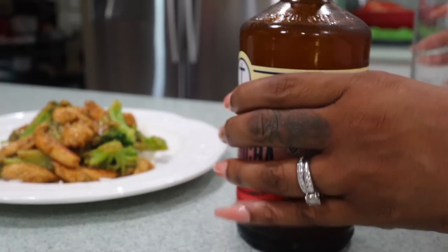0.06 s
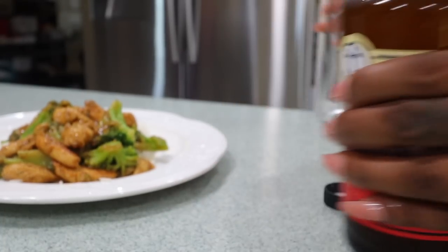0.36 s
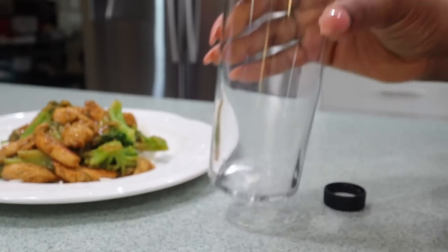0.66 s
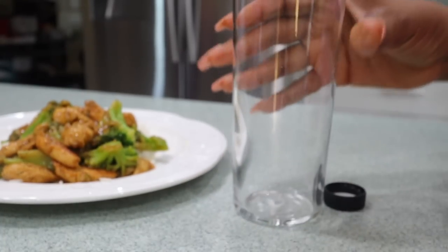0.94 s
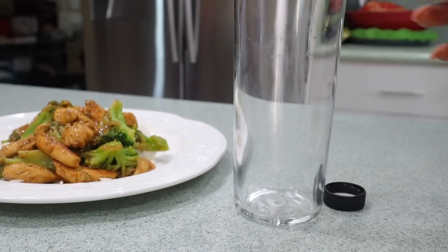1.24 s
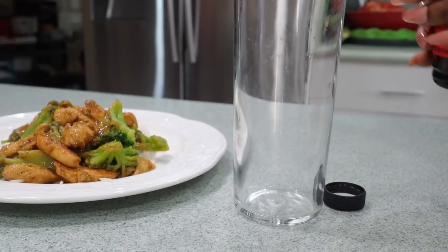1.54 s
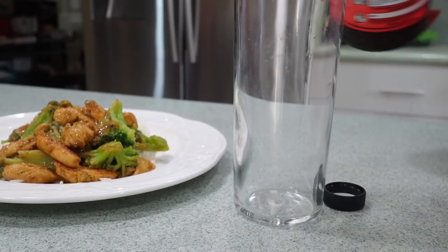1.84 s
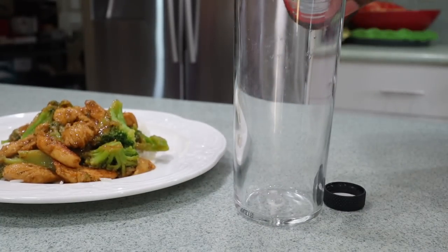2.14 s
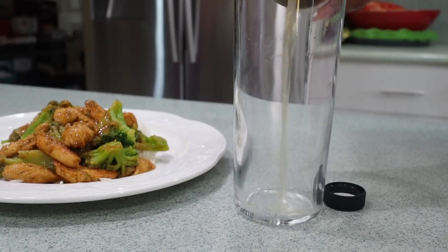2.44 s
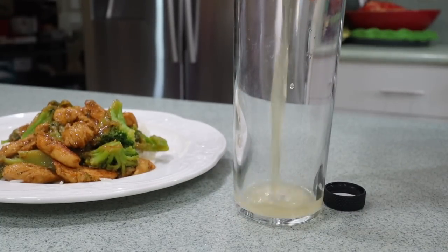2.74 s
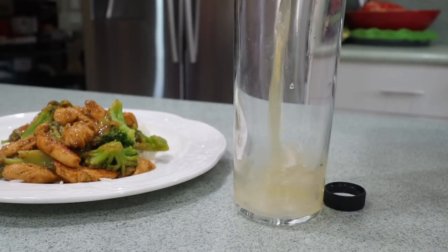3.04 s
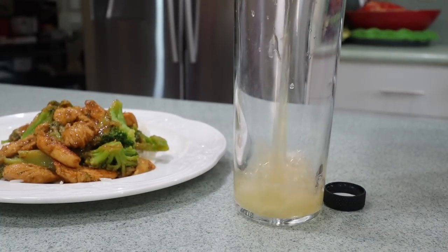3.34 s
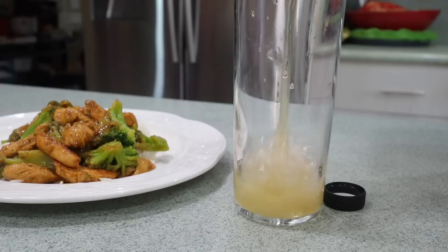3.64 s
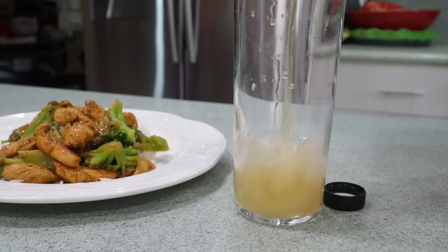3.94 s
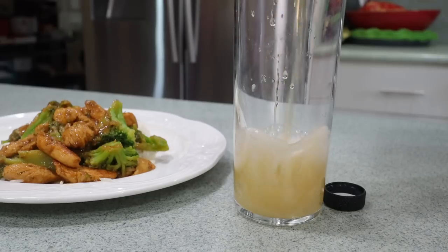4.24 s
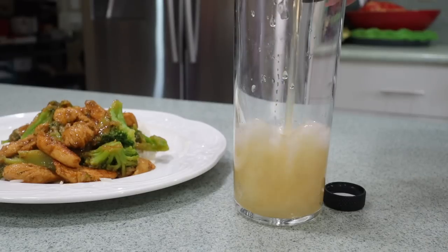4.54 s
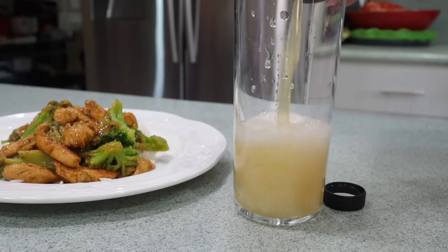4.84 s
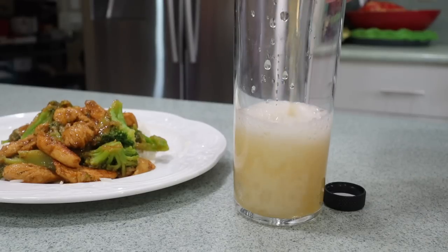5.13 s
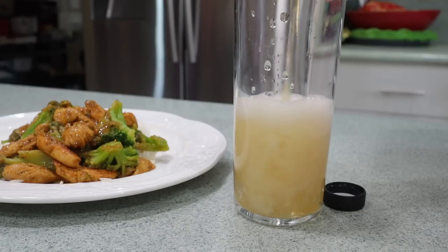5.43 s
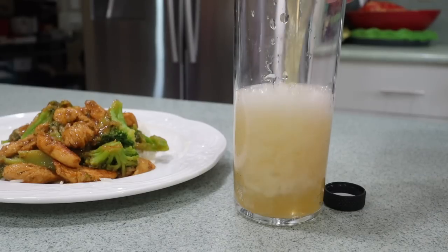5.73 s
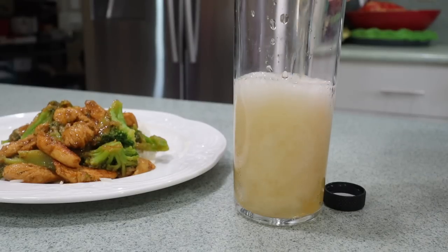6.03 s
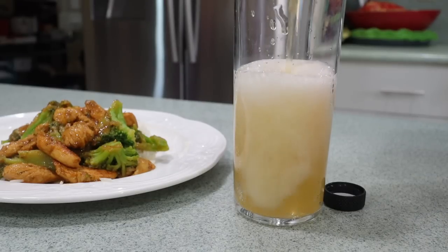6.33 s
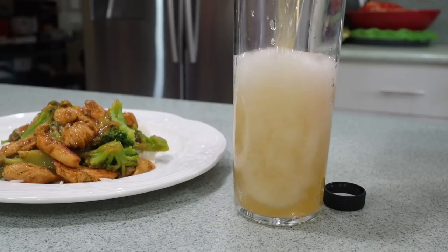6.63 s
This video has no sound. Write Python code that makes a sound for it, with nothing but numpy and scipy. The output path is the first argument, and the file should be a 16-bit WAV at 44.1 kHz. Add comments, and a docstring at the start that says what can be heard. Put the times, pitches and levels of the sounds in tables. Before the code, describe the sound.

Close by in a slightly echoing kitchen, a bottle lands with a double knock, then a glass clatters down and leaves a thin ring. After a short pause, a carbonated drink glugs out of the bottle and splashes brightly into the glass, with bubbly plops and tiny snaps. The pour climbs in pitch and grows softer and duller as fizzing foam builds. A fridge hums faintly underneath.

```python
"""Pouring a fizzy drink

A full bottle, then a tall glass, knock down on a kitchen counter; the glass rocks and sings on.
The bottle glugs as it gulps air, and each gush splashes, plops and snaps in the glass, whose air
column rises in pitch as it fills. A head of foam grows, muffles the splashing and fizzes finely.
The kitchen reverberates, and a fridge hums underneath."""
import sys
import numpy as np
from scipy import signal
from scipy.fft import rfft, irfft
from scipy.io import wavfile
from scipy.ndimage import uniform_filter1d

SR = 44100
rng = np.random.default_rng(int(sys.argv[2]) if len(sys.argv) > 2 else 0)


def transcribe(u):
    """Save the signal u as a 16-bit wav file named by the first command-line argument.

    u: samples, shape (n,) or (channels, n), limited to [-1, 1]; the rate is SR.
    q: integer samples, one column per channel.
    """
    v = np.clip(np.atleast_2d(u).T, -1, 1)
    q = np.round(v * 32767).astype(np.int16)
    wavfile.write(sys.argv[1], SR, q)


N = 298983
TIME = np.arange(N) / SR
CUTOFF_HZ = 15900
# cabinet under the counter: (frequency [Hz], level [dB], t60 [s])
CABINET_MODES = [(140, -31, 0.12), (209, -26.5, 0.25), (277, -28, 0.2), (366, -31, 0.16)]


def from_db(db):
    return 10 ** (np.asarray(db) / 20)


def rms_one(x):
    return x / np.sqrt(np.mean(x ** 2) + 1e-20)


def decay(t, t60):
    """An envelope that falls 60 dB in t60 seconds."""
    return np.exp(-np.log(1000) * t / t60)


def in_time(rows):
    """Each column of a breakpoint curve, at every sample."""
    times, *columns = np.transpose(rows)
    return [np.interp(TIME, times, column) for column in columns]


def at_hz(points, hz, column=1):
    """One column of a spectrum, read on a log-frequency axis."""
    table = np.array(points)
    return np.interp(np.log(hz + 1e-9), np.log(table[:, 0]), table[:, column])


def add(out, s, sound):
    """Mix a sound in from time s on."""
    i = max(round(s * SR), 0)
    out[i:i + len(sound)] += sound[:max(N - i, 0)]


def cut(x, hz, kind, order=2):
    """Butterworth low-, high- or band-pass."""
    return signal.sosfilt(signal.butter(order, np.clip(hz, 10, .45 * SR), kind, fs=SR, output="sos"), x)


def ring(x, hz, t60):
    """One mode: a unit click sets a sine of height 1 ringing."""
    r, w = decay(1 / SR, t60), 2 * np.pi * hz / SR
    return signal.lfilter([0, np.sin(w)], [1, -2 * r * np.cos(w), r * r], x + 1e-18)


def resonance(hz, width_hz):
    """Filter coefficients of a peak of gain 1."""
    r = np.exp(-np.pi * width_hz / SR)
    return np.array([1, 0, -1]) * (1 - r * r) / 2, [1, -2 * r * np.cos(2 * np.pi * hz / SR), r * r]


def gliding(x, hz, width_hz, block=512):
    """A resonance that follows curves of pitch and width."""
    out, state = np.zeros(N), np.zeros(2)
    for i in range(0, N, block):
        b, a = resonance(hz[i], width_hz[i])
        out[i:i + block], state = signal.lfilter(b, a, x[i:i + block], zi=state)
    return out


def evened(x, span_s):
    """Hold the short-term rms of a texture near 1."""
    power = uniform_filter1d(x ** 2, int(span_s * SR))
    return x / np.sqrt(np.abs(power) + 1e-4)


def blow(db, hardness_hz):
    """A contact click, duller for a softer hit."""
    return from_db(db) * cut(signal.unit_impulse(SR // 20), hardness_hz, "low", order=3)


def struck(force, modes):
    """A body rings; neighbouring modes swing in opposite directions."""
    return sum((-1) ** k * from_db(db) * ring(force, hz, t60) for k, (hz, db, t60) in enumerate(modes))


def bubble(hz, swell_s, t60, rise):
    """A sine that swells to height 1 and dies away, its pitch climbing by the share `rise` per t60."""
    t = TIME[:SR // 8]
    shape = (1 - np.exp(-(t / swell_s) ** 2)) * decay(t, t60)
    return shape / shape.max() * np.sin(2 * np.pi * hz * (t + rise * t * t / (2 * t60)))


def bubble_cloud(spectrum, per_s, spread_db, cycles, pitches=36):
    """Bubbles of random strength and pitch, each dying within `cycles` periods; rms 1."""
    out = np.zeros(N)
    for hz in np.geomspace(spectrum[0][0], min(spectrum[-1][0], CUTOFF_HZ), pitches):
        born = np.flatnonzero(rng.random(N) < per_s / pitches / SR)
        strength = from_db(spread_db * np.minimum(rng.exponential(1, len(born)), 4))
        clicks = np.zeros(N)
        clicks[born] = strength * rng.choice([-1, 1], len(born))
        out += from_db(at_hz(spectrum, hz)) * np.sqrt(hz) * rms_one(ring(clicks, hz, cycles / hz))
    return rms_one(cut(out, 0.68 * spectrum[0][0], "high"))


def room_tone(air_db=-59):
    """A bed of soft air noise and fridge hum."""
    # colour of the air: (frequency [Hz], relative level [dB])
    air_spectrum = [(12, -56), (20, -14), (26, -27), (65, -6), (101, -18.5), (163, -0.5), (241, -18.5),
                    (301, -12), (446, -16.5), (590, -16.5), (923, -24), (1090, -23.5), (2820, -32.5),
                    (6360, -33.5), (16000, -37.5)]
    # fridge: (frequency [Hz], level [dB])
    hum_partials = [(58, -72), (160, -75), (216, -68), (270, -73), (589, -69.5)]
    colour = from_db(at_hz(air_spectrum, np.fft.rfftfreq(N, 1 / SR)))
    air = irfft(rfft(rng.standard_normal(N)) * colour, N)
    hum = sum(from_db(db) * np.sin(2 * np.pi * (hz * TIME + rng.random())) for hz, db in hum_partials)
    return from_db(air_db) * rms_one(air) + hum


def kitchen_reverb(x, predelay_s=0.006, build_s=0.024, bands=16):
    """Diffuse reflections build up and die away band by band."""
    # reverb tail: (frequency [Hz], level [dB], t60 [s])
    tail_bands = [(59.64, -26, 0.2), (112, -18, 0.49), (170, -11.5, 0.33), (281.8, -13.5, 0.18),
                  (449.6, -14.5, 0.42), (695, -14.5, 0.13), (1130, -15.5, 0.34), (2493, -13.5, 0.38),
                  (4900, -18.5, 0.54), (8850, -20.5, 0.72), (16100, -24, 0.12)]
    t, response = TIME[:SR], 0
    edges = np.geomspace(50, CUTOFF_HZ, bands + 1)
    onset = 1 - np.exp(-np.maximum(t - predelay_s, 0) / build_s)
    for low, high in zip(edges, edges[1:]):
        hz = np.sqrt(low * high)
        shape = onset * decay(t, at_hz(tail_bands, hz, column=2))
        noise = cut(rng.standard_normal(SR), [low, high], "band")
        response += from_db(at_hz(tail_bands, hz)) * noise * shape / np.linalg.norm(shape)
    return signal.fftconvolve(x, response)[:N]


def bottle_knocks(bass_cut_hz=400, cabinet_db=-7):
    """The full bottle thuds on the counter and rings briefly."""
    # it lands on one edge, then flat: (time [s], level [dB], contact hardness [Hz])
    landings = [(0.0713, -9.5, 2200), (0.1292, -5.5, 1050)]
    # bottle standing on the counter: (frequency [Hz], level [dB], t60 [s])
    bottle_modes = [(560.5, -3.5, 0.12), (677, -11.5, 0.048), (795, -23, 0.05), (1032, -8, 0.036),
                    (1179, -9, 0.066), (1423, -10.5, 0.023), (1543, -9.5, 0.042), (1690, -4, 0.019),
                    (2215, -8, 0.019), (3270, -11, 0.0065), (4620, -22, 0.08), (9600, -9.5, 0.092)]
    force = np.zeros(SR)
    for s, db, hardness_hz in landings:
        add(force, s, blow(db, hardness_hz))
    knock = cut(struck(force, bottle_modes), bass_cut_hz, "high", order=3)
    boom = from_db(cabinet_db) * cut(struck(force, CABINET_MODES), 68, "high")
    return np.pad(knock + boom, (0, N - len(knock)))


def glass_knocks(bass_cut_hz=430, clatter_t60=0.22, clatter_db=-15):
    """The glass rocks on its foot; each blow rings the counter and the glass itself."""
    # blows: (time [s], level [dB], contact hardness [Hz], glass ring re the blow [dB])
    landings = [(0.8242, -2, 11800, 3), (.8425, -12, 2470, -5), (0.869, -12, 1900, 14),
                (0.93, -10.5, 1300, 5.5), (.948, -13, 1070, 13.5), (.982, -17, 1700, 0.5),
                (.9975, -16, 586, -21), (1.033, -17.5, 540, -10)]
    # counter top: (frequency [Hz], level [dB], t60 [s])
    counter_modes = [(569.9, -1.5, 0.079), (675, -14.5, 0.085), (684, -18, 0.16), (842, -6.5, 0.014),
                     (946, -11, 0.069), (1200, -10.5, 0.032), (1390, -6.5, 0.021), (1595, -2, 0.019),
                     (2233, -9, 0.019), (3306, -6.5, 0.01), (5270, -4.5, 0.0022), (8300, -11, 0.0038)]
    # glass wall, held in the hand: (frequency [Hz], level [dB], t60 [s])
    glass_modes = [(1360, -32, 0.46), (4650, -19, 0.029), (4580, -21.5, 0.085), (9490, -15, 0.0093),
                   (9650, -27, 0.054), (13080, -32.5, 0.065), (14700, -18, .018)]
    on_counter, on_glass = np.zeros((2, 2 * SR))
    for s, db, hardness_hz, glass_db in landings:
        add(on_counter, s, blow(db, hardness_hz))
        add(on_glass, s, blow(db + glass_db, hardness_hz))
    motion = struck(on_counter, counter_modes) + struck(on_glass, glass_modes)
    # the hard foot also wakes countless weak modes, which merge into a clatter
    t = TIME[:SR // 4]
    weak_modes = cut(cut(rng.standard_normal(len(t)), 520, "high"), 3600, "low", order=3)
    clatter = signal.fftconvolve(on_glass, weak_modes * decay(t, clatter_t60))[:len(motion)]
    # the stiff slab radiates little bass; the cabinet under it booms faintly
    knock = cut(motion, bass_cut_hz, "high", order=3)
    boom = cut(struck(on_counter, CABINET_MODES), 55, "high")
    return np.pad(knock + from_db(clatter_db) * clatter + boom, (0, N - len(knock)))


def chinks(touch_t60=0.043):
    """A light touch on glass rings a single mode; a tick of jewellery rings several."""
    # touches: (time [s], level [dB], pitch [Hz])
    touches = [(1.324, -55.5, 2320), (2.382, -62, 4800), (5.361, -33, 3020), (6.761, -47.5, 3880)]
    # the hand's jewellery meets glass: (time [s], level [dB])
    jewellery_ticks = [(.12, -49), (.143, -50.5), (0.959, -52), (0.966, -54)]
    # ring of a tick: (frequency [Hz], level [dB], t60 [s])
    tick_modes = [(5340, -2, 0.07), (5570, -2, 0.06), (7760, -6, 0.045), (8500, -7, 0.045),
                  (11030, -7, 0.05), (13300, -13, 0.044)]
    out, click = np.zeros(N), signal.unit_impulse(SR // 2)
    for s, db, hz in touches:
        add(out, s, from_db(db) * ring(click, hz, touch_t60))
    for s, db in jewellery_ticks:
        add(out, s, from_db(db) * struck(click, tick_modes))
    return out


def rim_ring(release_s=0.97, hz=1361, beat_hz=2.37, t60=1.43, level_db=-40, twin_db=-6):
    """Let go, the glass sings on in its lowest mode, a close pair that beats slowly."""
    out, t = np.zeros(N), TIME[:2 * SR]
    pair = np.sin(2 * np.pi * hz * t) + from_db(twin_db) * np.sin(2 * np.pi * (hz + beat_hz) * t)
    add(out, release_s, from_db(level_db) * pair * decay(t, t60))
    return out


def fizz(foam, level_db=-65):
    """Countless tiny bubbles burst in the head."""
    # colour of the fizz: (frequency [Hz], relative density [dB])
    fizz_spectrum = [(1000, 0), (1600, -4.5), (3000, -4), (5000, 6), (8000, 2.5), (11000, 5.5),
                     (16000, -3.5)]
    return from_db(level_db) * foam * bubble_cloud(fizz_spectrum, per_s=1700, spread_db=3, cycles=5)


def snaps(crack_s=0.002, ring_width_hz=450, ring_db=11, treble_hz=7000, trim_db=0.5):
    """Drops and bursting bubbles snap on the glass: a tiny crack with a brief ring."""
    # snaps: (time [s], peak before trim [dB], ring pitch [Hz], treble shelf [dB])
    snap_cues = [(2.5042, -38.5, 5300, -5), (2.652, -38, 8100, -22), (2.812, -31, 4660, -23),
                 (2.9344, -28, 6800, 19), (2.9709, -18.5, 3740, 4.5), (3.018, -28, 8160, -1),
                 (3.0995, -24, 5900, -10), (3.132, -25.5, 8150, -6), (3.267, -28, 2950, -6),
                 (3.39, -23, 6260, -24), (3.6831, -20.5, 2900, 1), (4.078, -23, 3420, -22),
                 (4.1164, -24.5, 5270, -17), (4.651, -30, 5600, -12), (5.359, -23.5, 2840, 3),
                 (5.7089, -28, 8000, -3), (6.4492, -42, 5400, 6), (6.4723, -29, 11550, -1.5)]
    out, t = np.zeros(N), TIME[:SR // 20]
    for s, db, hz, treble_db in snap_cues:
        crack = cut(rng.standard_normal(len(t)) * np.exp(-t / crack_s), 530, "high", order=1)
        crack += (from_db(treble_db) - 1) * cut(crack, treble_hz, "high", order=1)
        snap = crack + from_db(ring_db) * signal.lfilter(*resonance(hz, ring_width_hz), crack)
        add(out, s + 0.001, from_db(db + trim_db) * snap / np.abs(snap).max())
    return out


def plinks():
    """Small bubbles chirp as they near the surface."""
    # single clear bubbles: (time [s], peak [dB], pitch [Hz])
    small_bubbles = [(2.7365, -39.5, 1910), (2.7523, -37, 1640), (2.8157, -31.5, 1580),
                     (2.859, -38.5, 3560), (2.8853, -32, 1760), (2.9639, -31, 1530), (3.1443, -30, 1580),
                     (3.175, -31, 4580), (3.156, -33, 1580), (3.164, -34, 2150), (3.177, -32, 1680),
                     (3.2866, -29.5, 1670), (3.349, -39.5, 3370), (3.372, -36.5, 1770), (3.4105, -29, 1716),
                     (3.6633, -33, 1640), (3.726, -31.5, 3250), (3.9743, -30, 1820), (4.353, -34.5, 3150),
                     (4.433, -34, 1840), (4.572, -40, 2050)]
    out = np.zeros(N)
    for s, db, hz in small_bubbles:
        add(out, s, from_db(db) * bubble(hz, swell_s=0.00027, t60=0.028, rise=0.033))
    return out


def plops(foam, clear_t60=0.048, foamy_t60=0.019, body_hz=370, body_db=-9.5, pop_hz=1300, pop_db=4.5):
    """A trapped bubble swells into the air column's note; foam shortens the ring to a dull pop."""
    # big bubbles: (time [s], peak of the note [dB], pitch [Hz])
    big_bubbles = [(3.22, -28, 596), (3.331, -20.5, 611), (3.399, -18.5, 608), (3.552, -26.5, 616),
                   (3.781, -30, 596), (3.803, -28.5, 620), (3.828, -27, 642), (3.922, -25.5, 630),
                   (3.938, -24, 579), (4.025, -27.5, 638), (4.08, -27.5, 630), (4.254, -19.5, 650),
                   (4.271, -28, 665), (4.325, -33, 662), (4.432, -41.5, 673), (4.475, -32.5, 664),
                   (4.491, -37, 630), (4.558, -32, 679), (4.654, -30.5, 686), (4.769, -38, 690),
                   (4.979, -34, 564), (5.148, -32.5, 530), (5.632, -36.5, 680), (6.049, -40, 592),
                   (6.197, -38.5, 567)]
    # plops gain a low body once the drink is deep: (time [s], share of the body [0-1])
    depth_curve = [(3.4, 0), (3.8, 1)]
    out, (depth,) = np.zeros(N), in_time(depth_curve)
    for s, db, hz in big_bubbles:
        cover, deep = foam[round(s * SR)], depth[round(s * SR)]
        note = bubble(hz, swell_s=0.0026, t60=np.interp(cover, [0, 1], [clear_t60, foamy_t60]), rise=0.057)
        body = bubble(body_hz * rng.uniform(0.762, 1.22), swell_s=0.00077, t60=0.057, rise=0.06)
        pop = bubble(pop_hz * rng.uniform(0.49, 1.51), swell_s=0.0001, t60=0.0096, rise=0)
        plop = note + deep * from_db(body_db) * body + cover * from_db(pop_db) * pop
        add(out, s - 0.00101, from_db(db) * plop)
    return out


def glugs(gulp_hz=107.6, gulp_db=-38.5, db_per_octave=19.5, half_cycles=2.4, octaves_per_cycle=0.35,
          thump_hz=155, thump_half_s=0.0021, flutter=0.2):
    """Air pushes in through the neck: a short low tone sweeps up as each bubble pinches off."""
    # the bottle gulps about six times a second: (time [s], level [dB])
    gulps = [(2.369, -53.5), (2.494, -34), (2.654, -44), (2.805, -49), (2.948, -50), (3.082, -46),
             (3.219, -46), (3.375, -49.5), (3.52, -50.5), (3.657, -48.5), (3.814, -48.5), (3.968, -48.5),
             (4.113, -43), (4.248, -46.5), (4.428, -38.5), (4.602, -37.5), (4.76, -42), (4.923, -40),
             (5.117, -37), (5.301, -37.5), (5.448, -41), (5.625, -46.5), (5.839, -46), (6.039, -42),
             (6.311, -44.5)]
    # air pockets sloshing: (time [s], level [dB], pitch [Hz], half length [s], glide [octaves/s])
    bloops = [(0.203, -38.5, 245, 0.041, -8), (2.835, -50.5, 355, 0.011, 0), (2.989, -39.5, 282, 0.023, 8),
              (3.112, -41, 293, 0.018, 7), (3.25, -50, 330, 0.02, 9), (5.728, -25.5, 143, 0.018, -12)]
    # dull thumps late in the pour: (time [s], level [dB])
    thumps = [(5.359, -28), (5.713, -30), (6.475, -25)]
    out, t = np.zeros(N), TIME[:SR // 5] - 0.1
    tones = list(bloops) + [(s, db, thump_hz, thump_half_s, 0) for s, db in thumps]
    for s, db in gulps:
        hz = gulp_hz * 2 ** ((db - gulp_db) / db_per_octave)   # a stronger gulp peaks at a higher pitch
        tones.append((s, db, hz, half_cycles / hz, octaves_per_cycle * hz))
    for s, db, hz, half_s, glide in tones:
        octaves = np.minimum(glide * t, 0.5)   # the sweep levels off once the bubble is free
        phase = 2 * np.pi * np.cumsum(hz * 2 ** octaves) / SR
        wall_wobble = 1 + flutter * rms_one(cut(rng.standard_normal(len(t)), 130, "low"))
        swell = from_db(db) * np.exp(-(t / half_s) ** 2)
        add(out, s + t[0], swell * wall_wobble * np.sin(phase - phase[len(t) // 2]))
    return cut(out + 1e-18, 45, "high")


def in_glass(x, column_hz, foam, foam_damping=2.2):
    """The air in the glass colours the splashing; foam widens the modes along the column."""
    # along the air column: (multiple of the column pitch, width without foam [Hz], level [dB])
    column_modes = [(0.998, 65.44, 22), (2.75, 264, 10), (3.15, 216, 2)]
    # across the glass: (frequency [Hz], width [Hz], level [dB])
    cross_modes = [(3230, 690, 11), (4570, 390, 4), (5510, 470, 2.5)]
    widen = 1 + foam_damping * foam
    along = sum(from_db(db) * gliding(x, k * column_hz, width * widen) for k, width, db in column_modes)
    across = sum(from_db(db) * signal.lfilter(*resonance(hz, width), x) for hz, width, db in cross_modes)
    return x + along + across


def under_foam(x, foam, muffle_hz=1500):
    """The head takes the edge off the bubbles under it."""
    return (1 - foam) * x + foam * cut(x, muffle_hz, "low", order=1)


def gushes(attack_s=0.001, release_s=0.0065, sag_db_per_s=48, trim_db=0.5):
    """Splash envelope: each gush hits at once, sags while it lasts and dies quickly."""
    # gushes hitting the drink, roughly one a gulp: (time [s], length [s], level before trim [dB])
    gush_cues = [(2.705, 0.0087, -50), (2.819, 0.0072, -54), (2.854, 0.024, -57), (2.949, 0.043, -47),
                 (3.132, 0.058, -42), (3.265, 0.059, -45), (3.388, 0.05, -45), (3.511, 0.032, -45.5),
                 (3.635, 0.033, -51.5), (3.685, 0.066, -44.5), (3.762, 0.077, -46), (3.914, 0.12, -44),
                 (4.051, 0.073, -43.5), (4.212, 0.02, -46.5), (4.246, 0.072, -48), (4.346, 0.015, -40.5),
                 (4.436, 0.011, -49.5), (4.484, 0.016, -43), (4.543, 0.075, -52), (4.765, 0.035, -45),
                 (4.94, 0.05, -49.5), (5.091, 0.062, -51.5), (5.308, 0.044, -47), (5.466, 0.024, -54.5),
                 (5.637, 0.013, -51.5), (5.792, 0.023, -56), (5.868, 0.019, -53), (6.051, 0.009, -58.5),
                 (6.197, 0.0038, -49.5), (6.363, 0.0025, -52)]
    out, t = np.zeros(N), TIME[:SR // 5]
    for s, length_s, db in gush_cues:
        shape = (1 - np.exp(-t / attack_s)) * np.exp(-np.maximum(t - length_s, 0) / release_s)
        add(out, s, from_db(db + trim_db - sag_db_per_s * t) * shape)
    return out


def pour(column_hz, foam, spray_db=6.5, smother_db=16.5, smothered_at=0.26, gush_gurgle_db=-6,
         trickle_db=-61.5, drizzle_db=-56.5, gurgle_db=-59, foam_boost_db=4):
    """The stream beats bubbles and spray into the drink, densely in a gush and sparsely between."""
    # bubbles in the drink: (frequency [Hz], relative density [dB])
    bubble_spectrum = [(350, 0.5), (600, -1.5), (1000, -9), (1700, 11), (2500, -10), (4000, -9),
                       (6000, -37), (9000, -62)]
    # fine spray: (frequency [Hz], relative density [dB])
    spray_spectrum = [(2000, -13.5), (3000, -5), (4500, -3), (8000, -3.5), (11000, -5), (16000, -13)]
    # strength of the stream between gushes: (time [s], gain [dB])
    flow_curve = [(2.3, -57.5), (2.7, -10), (3.15, 1.5), (3.6, -3.5), (3.88, -7.5), (4.05, -3.5),
                  (4.6, 3.5), (5.0, -4.5), (5.6, -11), (6.1, -10.5), (6.78, -13)]
    flow = from_db(in_time(flow_curve)[0])
    dense = bubble_cloud(bubble_spectrum, per_s=1600, spread_db=6, cycles=30)
    sparse = bubble_cloud(bubble_spectrum, per_s=600, spread_db=5, cycles=22)
    spray = bubble_cloud(spray_spectrum, per_s=4000, spread_db=5.5, cycles=36)
    churn = bubble_cloud(bubble_spectrum, per_s=900, spread_db=4.5, cycles=14, pitches=14)
    dense = in_glass(under_foam(dense, foam), column_hz, foam)
    sparse = in_glass(under_foam(sparse, foam), column_hz, foam)
    spray = in_glass(spray, column_hz, foam)
    gurgle = evened(gliding(churn, column_hz, width_hz=50 + 70 * foam), span_s=0.039)
    # the growing head smothers the spray, and the hollow gurgle stands out
    spray_gain = from_db(spray_db - smother_db * np.minimum(foam / smothered_at, 1))
    splash = (evened(dense, span_s=0.01)
              + spray_gain * evened(spray, span_s=0.012)
              + from_db(gush_gurgle_db) * gurgle)
    trickle = (from_db(trickle_db) * evened(sparse, span_s=0.12)
               + from_db(drizzle_db) * (1 - foam) * evened(spray, span_s=0.091)
               + from_db(gurgle_db + foam_boost_db * foam) * gurgle)
    return gushes() * splash + flow * trickle


def scene(drink_send_db=-0.5, glug_send_db=0.5):
    """Bottle and glass are set down, then the drink is poured; the kitchen answers each."""
    # the glass fills: (time [s], air column pitch [Hz], foam cover [0-1])
    fill_curve = [(0, 497.6, 0), (2.7, 521, 0), (3.3, 611, 0.16), (4, 617, 0.15), (4.5, 688, 0.48),
                  (5, 706, 0.51), (5.6, 780, 0.96), (6.1, 928, 0.76), (6.78, 1157, 1)]
    column_hz, foam = in_time(fill_curve)
    handling = bottle_knocks() + glass_knocks() + chinks()
    drink = pour(column_hz, foam) + plops(foam) + plinks() + snaps() + fizz(foam)
    glugging = glugs()
    reverb = kitchen_reverb(handling + from_db(drink_send_db) * drink + from_db(glug_send_db) * glugging)
    return (handling + rim_ring() + drink + glugging + reverb + room_tone())[None]


def record(dry):
    """Peaks clip at full scale; a steep low-pass takes off the very top."""
    low_pass = signal.ellip(10, 0.1, 80, CUTOFF_HZ, fs=SR, output="sos")
    return signal.sosfilt(low_pass, np.clip(dry, -1, 1))


dry = scene()
out = record(dry)
transcribe(out)
```